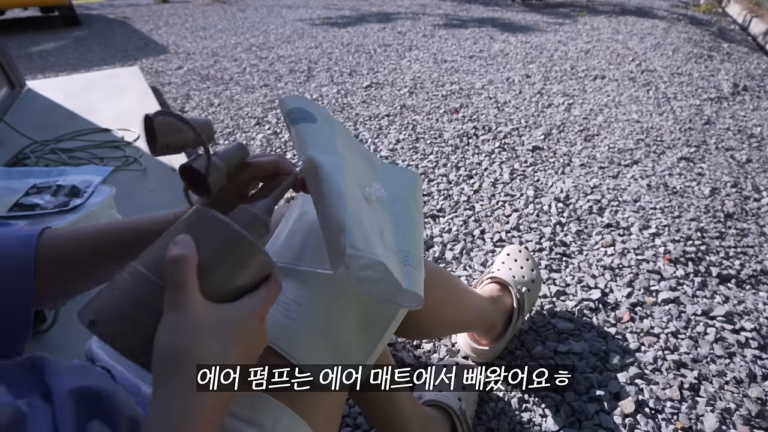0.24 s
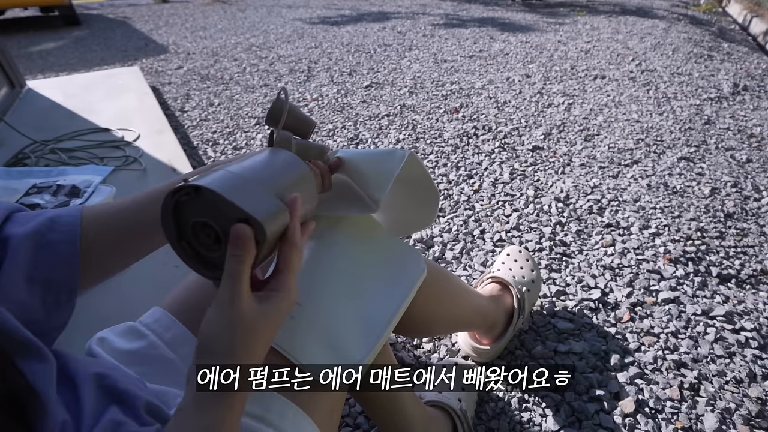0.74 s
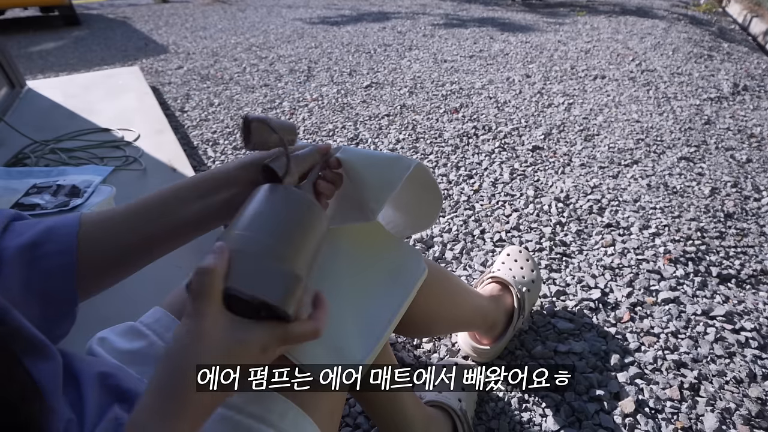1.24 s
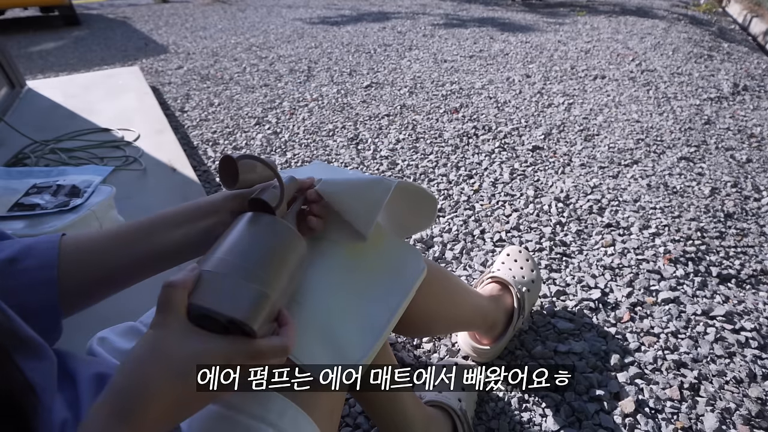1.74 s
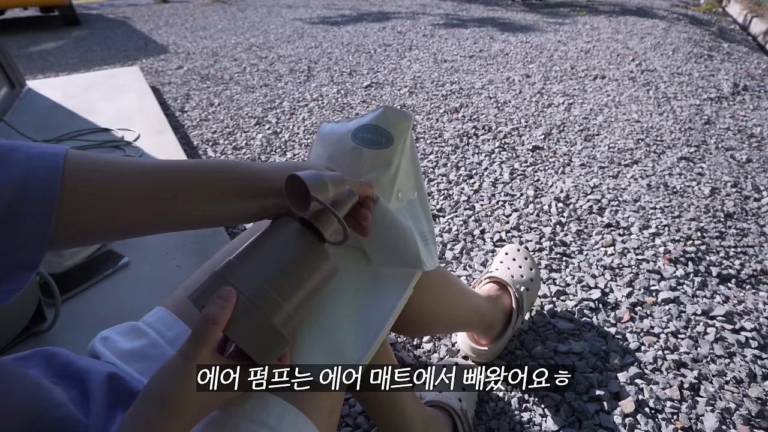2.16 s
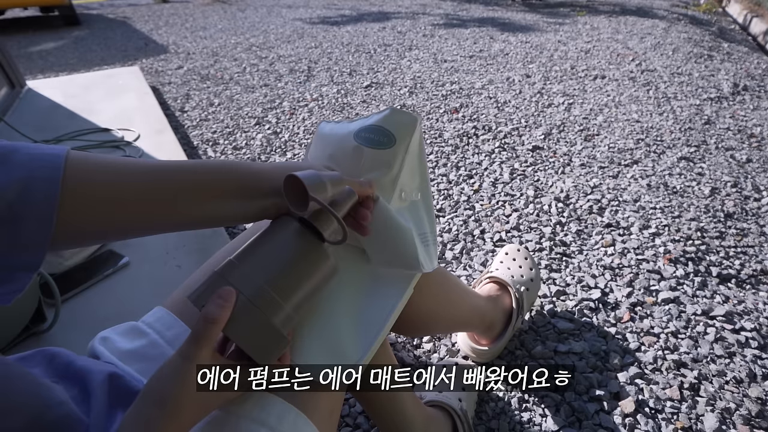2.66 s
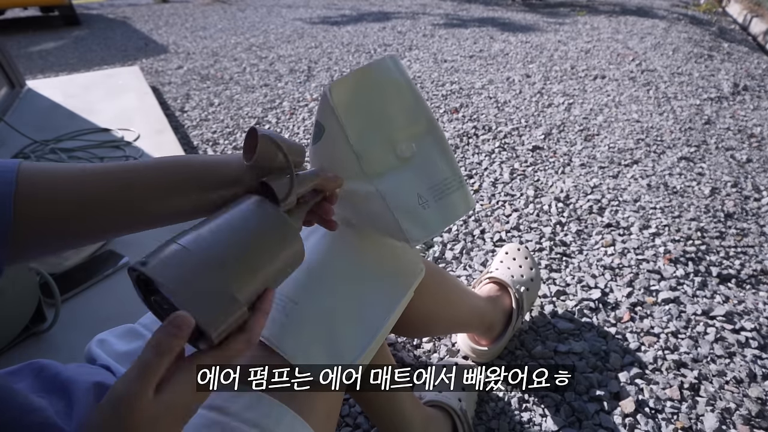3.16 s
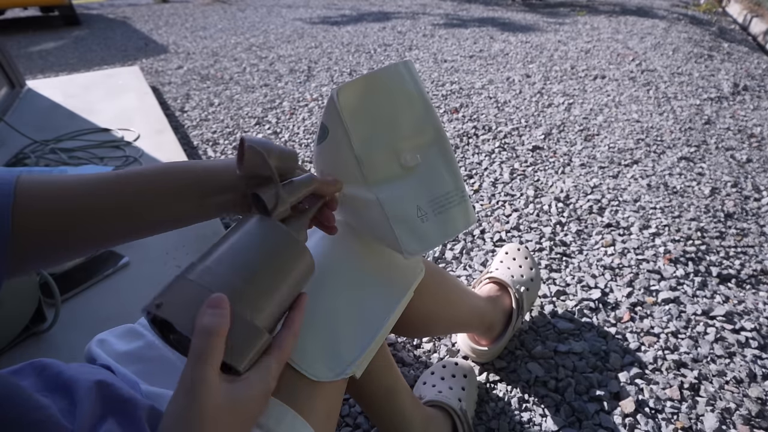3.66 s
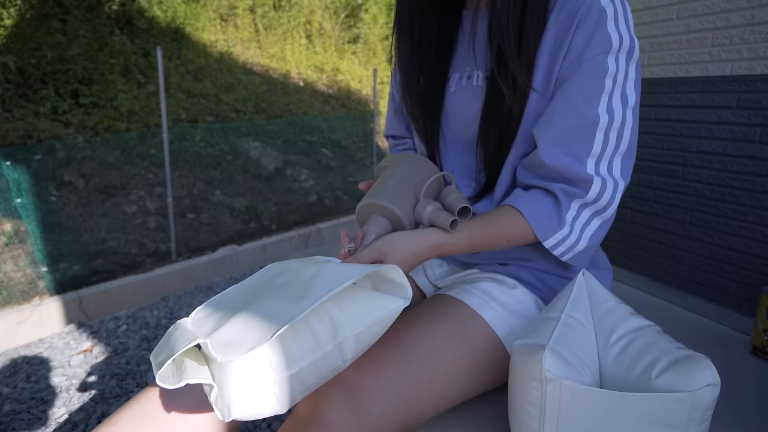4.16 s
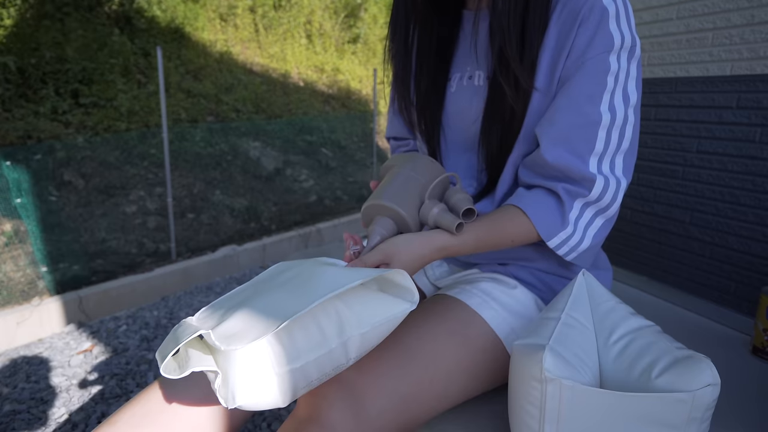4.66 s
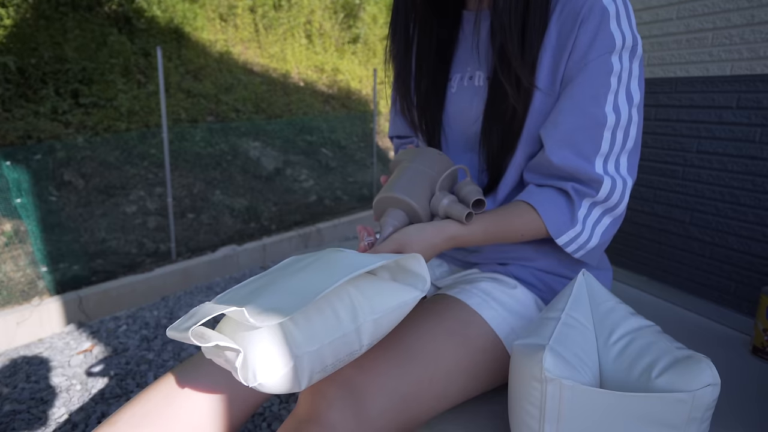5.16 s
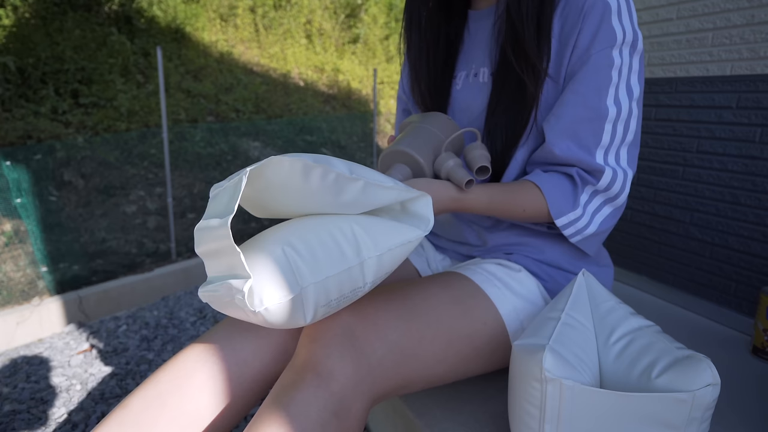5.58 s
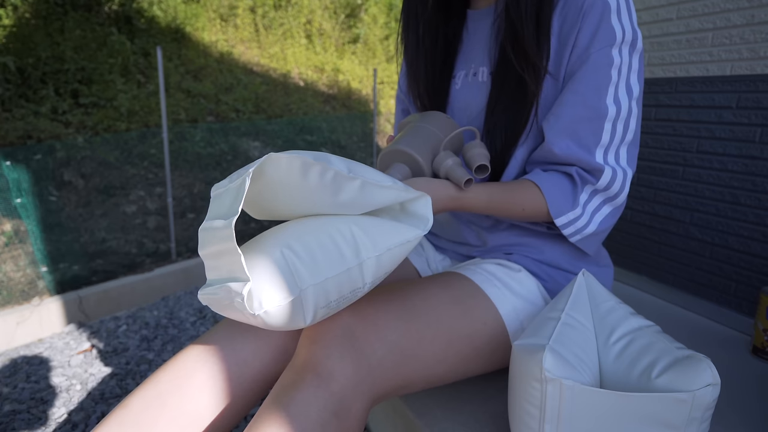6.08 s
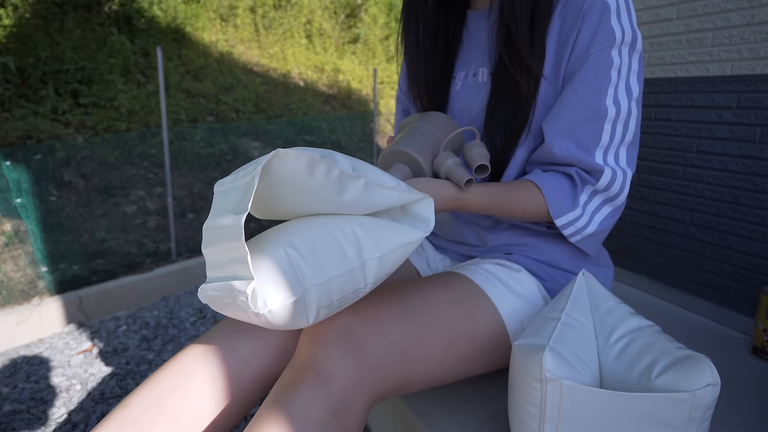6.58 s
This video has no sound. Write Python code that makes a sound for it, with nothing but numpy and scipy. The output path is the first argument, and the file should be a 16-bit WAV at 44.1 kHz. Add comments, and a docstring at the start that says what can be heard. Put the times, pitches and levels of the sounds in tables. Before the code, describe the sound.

Outdoors and close-miked, low wind rumble and insects give way to a handheld inflator: stuttering knocks, a climbing whine, then a steady hissing rush with a clear buzzing tone. Switched off, its pitch slides down; the nozzle snaps free and vinyl scuffs. A cut leads straight to a second start, less piercing and airier, holding steady at full speed until the end.

```python
"""A breeze and insects are heard first, made of coloured noise, with a soft tap and a small chirp.
The air suddenly turns much quieter, and a small battery air pump for a vinyl pillow starts: its rotor
knocks and rattles on pulsed current, whines up to speed and runs: noise rushes, sines follow the rotor.
Switched off, it coasts down while the nozzle is pulled off the valve with ticks, scuffs and a hard snap.
Abruptly, heard from the front, it starts once more and runs to the end; a quiet yard lies behind it."""
import sys
import numpy as np
from scipy import signal
from scipy.fft import rfft, irfft, next_fast_len
from scipy.io import wavfile
from scipy.ndimage import uniform_filter1d, minimum_filter1d, map_coordinates

SR = 44100
rng = np.random.default_rng(int(sys.argv[2]) if len(sys.argv) > 2 else 0)


def dump(signal):
    """Clip the signal to [-1, 1] and save it as 16-bit WAV at the path in sys.argv[1]."""
    limited = np.clip(np.atleast_2d(signal).T, -1, 1)
    pcm = np.round(limited * 32767).astype(np.int16)
    wavfile.write(sys.argv[1], SR, pcm)


N = 300266
TIME = np.arange(N) / SR  # seconds
CHOP_HZ = 97.3  # current pulses per second during a soft start

# Rotor speed, rising along an S-curve. Each row: time in seconds, turns per second.
FIRST_START_SPEED = [(0.79, 0.5), (0.92, 31.4), (1.05, 104.4), (1.18, 201.0), (1.31, 299.1), (1.44, 380.0),
                     (1.56, 435.6), (1.66, 471.0), (1.75, 488.5), (1.85, 501.1), (1.945, 507.2)]
# Full-speed settings in dB, in order: low airflow, housing rasp, jet hiss, whine.
FIRST_START_LEVELS = (-34.2, -29.6, -37, -19.6)
# How those four layers grow. Each row: dB lower at rest, turns per second by which most is gained.
FIRST_START_GROWTH = [(9, 270), (3, 250), (3, 250), (57.8, 240)]
# Peaks and dips of housing and nozzle, as the pump is held. Each row: centre in Hz, width in Hz, dB.
FIRST_START_BODY = [(298, 60, 4), (675, 130, 3), (961, 167, -3.5), (2180, 580, 10.5), (2860, 300, 7),
                    (3300, 250, -5), (3950, 450, 4), (4650, 450, -9), (5680, 578, -14.0),
                    (5700, 1800, 10.5), (7140, 3300, -6), (10100, 960, -4.4), (11988, 690, -4.9)]
# Strength of the rotor's harmonics. Each row: multiple of the speed, dB.
FIRST_START_HARMONICS = [(1, 6.6), (2, -19.7), (3, -0.4), (4, 3.8), (5, 5.1), (6, 10.9), (7, 11.9),
                         (8, 11.1), (9, 4.6), (10, 5.7), (11, 3.6), (12, 3.4), (13, -1.9), (14, -2.4),
                         (15, -1.8), (16, 3.5), (17, -2.7), (18, -0.7), (19, 1.9), (20, -3.4), (21, -7.0),
                         (22, -2.0), (23, -8.8), (24, -1.2), (25, -6.1), (26, -14.2)]
# How the plastic shell passes the sweeping harmonics. Each row: frequency in Hz, dB.
FIRST_START_SHELL = [(100, -45), (260, -36), (480, -19), (700, 0), (950, -15), (1400, -19), (1680, -19),
                     (1820, -10), (2100, -17), (2240, -19), (2380, -28), (2660, -26), (2800, -38),
                     (3000, -35), (3480, -42), (3720, -32), (3960, -31), (4440, -36), (5160, -25),
                     (5880, -35), (6600, -32), (8300, -39), (9200, -36), (11000, -43), (13500, -32)]
# Tone colour of the slow rotor's rattle. Each row: frequency in Hz, relative dB per Hz.
FIRST_RATTLE = [(650, -48), (1100, -18.5), (1750, -8), (2200, 1), (2460, -5), (2790, -24), (3010, -14),
                (3300, -26.5), (4100, -19), (4400, -24), (4900, -12.5), (5300, -14), (5700, -24),
                (6170, -17), (6680, -32), (8260, -24.5), (12400, -44), (14600, -38), (16000, -47)]


def first_start():
    """Chopped current sets the rotor turning, and its tones climb as it gains speed."""
    motion = running_up(.79, 1.945, FIRST_START_SPEED, FIRST_START_LEVELS, FIRST_START_GROWTH)
    start = dict(colour=FIRST_RATTLE, loose_s=1.026, swell_s=.006, rattle_db=-21.6, held_db=22,
                 pulse_s=1.0366, hum_db=-42)
    return pump(motion, FIRST_START_BODY, FIRST_START_HARMONICS, shimmer_db=2.8, bearing_db=-13,
                throb=.3, shell=FIRST_START_SHELL, start=start, ripple_db=-52)


# Running speed, wavering slightly with the load. Each row: time in seconds, turns per second.
FIRST_RUN_SPEED = [(1.945, 517.3), (2.05, 519.2), (2.25, 520.6), (2.45, 518.7), (2.85, 518.7),
                   (3.112, 519.8)]
# Settings in dB, in order: low airflow, housing rasp, jet hiss, whine.
FIRST_RUN_LEVELS = (-36.7, -28.7, -35.6, -31.2)
# Peaks and dips of housing and nozzle. Each row: centre in Hz, width in Hz, dB.
FIRST_RUN_BODY = [(285, 160, -3), (656, 63, 1), (964, 210, -8), (1600, 940, 8), (1930, 140, -12.1),
                  (2860, 340, 17), (3370, 160, -12), (4730, 380, -17), (4850, 130, 22), (5795, 551, -6),
                  (7349, 682, -14.0), (7530, 2146, 7.2), (14018, 824, 4.5)]
# Strength of the rotor's harmonics. Each row: multiple of the speed, dB.
FIRST_RUN_HARMONICS = [(1, -0.5), (2, -10.0), (3, -4.5), (4, -1.6), (5, -5), (6, -8), (7, -13), (8, -10),
                       (9, -13), (10, -10.5), (11, -29), (12, -24.5), (14, -32.6), (16, -17), (17, -18.5),
                       (18, -28.1), (19, -23), (20, -33), (24, -29), (25, -38.0), (26, -27.2)]


def first_run():
    """Near full speed, the load only slightly bends the steady whine."""
    motion = running(1.945, 3.112, FIRST_RUN_SPEED, FIRST_RUN_LEVELS)
    return pump(motion, FIRST_RUN_BODY, FIRST_RUN_HARMONICS, shimmer_db=1.5, bearing_db=-12, throb=.12)


# Speed after switching off, falling almost exponentially. Each row: time in seconds, turns per second.
COASTING_SPEED = [(3.112, 489.3), (3.2, 445.7), (3.3, 398.4), (3.43, 346.6), (3.56, 303.0), (3.68, 267.5),
                  (3.8, 235.9), (3.91, 211.3), (4.01, 185.6), (4.1, 165.6), (4.195, 149.1)]
# Settings in dB as the coast begins, in order: low airflow, housing rasp, jet hiss, whine.
COASTING_LEVELS = (-33.6, -27.6, -35.6, -29)
# dB lost each time the speed halves, for the same four layers in order.
LOSS_PER_HALVING = (2, 8.5, 6, 11.7)
# Further dB lost once the pump is free of the valve, for the same four layers in order.
LOSS_WHEN_FREE = (3, 5, 5, 8)
# Peaks and dips of housing and nozzle. Each row: centre in Hz, width in Hz, dB.
COASTING_BODY = [(350, 140, 4), (1057, 98, -9), (1410, 75, -9), (2250, 840, 14), (2439, 219, -8),
                 (2900, 300, 5), (3370, 120, -11), (4000, 438, 5), (4800, 1500, -6), (6022, 240, 5),
                 (7300, 560, -7)]
# Strength of the rotor's harmonics. Each row: multiple of the speed, dB.
COASTING_HARMONICS = [(1, 4.3), (2, 7.3), (3, -10.8), (4, -6.6), (5, -7.5), (6, 1.1), (7, 3.4), (8, 2.4),
                      (9, 4.0), (10, 2.2), (11, 3.1), (12, 2.1), (13, 3.0), (14, 3.7), (15, 1.2),
                      (16, -1.2), (17, 0.9), (18, 1.7), (19, -2.8), (20, -2.5), (21, -2.3), (22, -0.3),
                      (23, -1.5), (24, -0.1), (25, -3.1), (26, -1.6)]
# How the plastic shell passes the sweeping harmonics. Each row: frequency in Hz, dB.
COASTING_SHELL = [(100, -45), (170, -12), (260, -23), (350, -9), (480, -7), (700, -13), (950, -27),
                  (1200, -2), (1680, -3), (1820, 2), (1960, -1), (2100, 0), (2240, -9), (2520, -4),
                  (2800, -19), (3000, -15), (3480, -24), (3720, -13), (4440, -20), (4680, -10), (4920, -18),
                  (5160, -11), (5400, -21), (8300, -25), (9200, -19), (11000, -45)]


def coast_down(twist_s=3.64, flare_db=3.2, free_s=3.835, fade_s=.018):
    """The rotor slows and fades; the whine flares in the twist off the valve, then all layers drop."""
    t = times(3.112, 4.195)
    speed = speed_curve(COASTING_SPEED, t)
    free = step(t, free_s, fade_s)
    halvings = np.log2(speed[0] / speed)
    levels = np.array(COASTING_LEVELS)[:, None] - np.outer(LOSS_PER_HALVING, halvings)
    levels -= np.outer(LOSS_WHEN_FREE, free)
    levels[-1] += flare_db * step(t, twist_s, fade_s) * (1 - free)  # the last layer is the whine
    return pump((t, speed, levels), COASTING_BODY, COASTING_HARMONICS, shimmer_db=3.0, bearing_db=-30,
                throb=.4, shell=COASTING_SHELL)


# Rotor speed, rising along an S-curve. Each row: time in seconds, turns per second.
SECOND_START_SPEED = [(4.195, 0.0), (4.29, 35.0), (4.39, 124.4), (4.49, 223.9), (4.59, 304.6),
                      (4.69, 367.6), (4.8, 423.4), (4.92, 468.7), (5.05, 495.0), (5.2, 508.3),
                      (5.36, 514.4), (5.53, 517.0)]
# Full-speed settings in dB, in order: low airflow, housing rasp, jet hiss, whine.
SECOND_START_LEVELS = (-33.3, -28, -33.7, -43.2)
# How those four layers grow. Each row: dB lower at rest, turns per second by which most is gained.
SECOND_START_GROWTH = [(13, 220), (13, 310), (11, 280), (25, 240)]
# Peaks and dips of housing and nozzle. Each row: centre in Hz, width in Hz, dB.
SECOND_START_BODY = [(236, 87, -9), (656, 420, -0.5), (1120, 280, -17), (1700, 330, 7), (1960, 150, -4),
                     (2187, 140, 11), (2530, 430, -14.5), (2870, 690, 13.5), (4430, 250, -13),
                     (5640, 300, -11)]
# Strength of the rotor's harmonics. Each row: multiple of the speed, dB.
SECOND_START_HARMONICS = [(1, 28.2), (2, 30.8), (3, 16.3), (4, 13.9), (5, 11.6), (6, 16.9), (7, 12.8),
                          (8, 15.3), (9, 2.7), (10, -0.3), (11, 1.2), (12, 3.5), (13, -3.6), (14, -5.4),
                          (15, -7.6), (16, -0.3), (17, -8.3), (18, -8.2), (19, -10.6), (20, -13.5),
                          (21, -9.5), (22, -15.1), (23, -16.0), (24, -15.3), (25, -19.7), (26, -19.8)]
# How the plastic shell passes the sweeping harmonics. Each row: frequency in Hz, dB.
SECOND_START_SHELL = [(230, -42), (350, -28), (480, -21), (700, -31), (950, -33), (1200, -16), (1420, -6),
                      (1550, -17), (1700, -9), (2000, -7), (2200, 2), (2400, -6), (2650, -24), (3000, -16),
                      (3600, -16), (4150, -14), (4500, -1), (4850, -4), (5150, 3), (5500, -12), (6000, -16),
                      (6800, -2), (8300, 0), (11000, -9), (13500, 0)]
# Tone colour of the slow rotor's rattle. Each row: frequency in Hz, relative dB per Hz.
SECOND_RATTLE = [(650, -41), (1100, -12), (1590, -7.5), (2200, 0), (2640, -23), (3490, -16.5), (4130, -27),
                 (4610, -15.5), (5840, -28), (6980, -26), (7990, -36), (8840, -28), (10800, -36),
                 (14300, -37), (16000, -57)]


def second_start():
    """The same soft start with another tone colour, as the pump is heard from the front."""
    motion = running_up(4.195, 5.53, SECOND_START_SPEED, SECOND_START_LEVELS, SECOND_START_GROWTH)
    start = dict(colour=SECOND_RATTLE, loose_s=4.355, swell_s=.042, rattle_db=-26, held_db=19,
                 pulse_s=4.4765, hum_db=-50)
    return pump(motion, SECOND_START_BODY, SECOND_START_HARMONICS, shimmer_db=1.5, bearing_db=-15.5,
                throb=.12, shell=SECOND_START_SHELL, start=start, ripple_db=-36.5)


# Running speed, wavering slightly with the load. Each row: time in seconds, turns per second.
SECOND_RUN_SPEED = [(5.53, 525.1), (5.65, 526.2), (5.85, 526.7), (6.15, 525.3), (6.45, 526.5),
                    (6.81, 527.3)]
# Settings in dB, in order: low airflow, housing rasp, jet hiss, whine.
SECOND_RUN_LEVELS = (-34.2, -30.3, -33.8, -33.7)
# Peaks and dips of housing and nozzle. Each row: centre in Hz, width in Hz, dB.
SECOND_RUN_BODY = [(239, 220, -8), (744, 150, 0.5), (1150, 210, -15.5), (1985, 80, -8.2), (2440, 110, -17),
                   (2740, 130, -12), (3036, 240, 14.5), (4090, 350, 8.5), (4820, 190, -15),
                   (7300, 560, -6.6), (9541, 3100, 8), (9749, 920, -10.5), (14311, 569, 5.7)]
# Strength of the rotor's harmonics. Each row: multiple of the speed, dB.
SECOND_RUN_HARMONICS = [(1, -5.5), (2, -6), (3, -9), (4, 3), (5, -2.5), (6, -5), (7, -10), (8, -1),
                        (9, -12), (10, -16), (11, -17), (12, -13), (13, -20.6), (14, -34), (15, -32),
                        (16, -10.5), (18, -29.3), (20, -29.5), (21, -31.9), (22, -25), (24, -31.9),
                        (25, -19), (26, -26)]


def second_run():
    """Steady turning again, with steadier harmonics and stronger bearing tones."""
    motion = running(5.53, 6.81, SECOND_RUN_SPEED, SECOND_RUN_LEVELS)
    return pump(motion, SECOND_RUN_BODY, SECOND_RUN_HARMONICS, shimmer_db=.3, bearing_db=-6, throb=.12)


def pump(motion, body, harmonics, shimmer_db, bearing_db, throb, shell=None, start=None, ripple_db=None,
         wobble=0.00053, waver_db=.6):
    """One stretch of the pump: rushing air, rotor whine and, from rest, the soft start."""
    t, speed, (flow_db, rasp_db, hiss_db, whine_db) = motion
    turns = np.cumsum(speed * (1 + wobble * drift(35.8, t))) / SR
    air_levels = [db + waver_db * drift(9, t) for db in (flow_db, rasp_db, hiss_db)]
    flow, rush = airflow(t, speed, body, *air_levels)
    rush = rush * (1 + throb * np.cos(2 * np.pi * turns))  # the impeller rubs once a turn
    if start:
        share, rattle, hum = soft_start(t, speed, **start)
        rush = np.sqrt(1 - share) * rush + np.sqrt(share) * rattle
        rush = rush + hum + ripple(t, speed, turns, ripple_db)
    tones = from_db(whine_db) * whine(t, speed, turns, harmonics, shell, shimmer_db)
    tones = tones + from_db(rasp_db + bearing_db) * bearing(t, turns, speed)
    out = np.zeros(N)
    out[np.searchsorted(TIME, t)] = flow + rush + tones
    return out


# Broad tone colour of the rushing air. Each row: frequency in Hz, dB.
AIR_COLOUR = [(100, -31), (200, -30), (300, -9), (480, -2.5), (1100, -13.5), (2000, -4.5), (3500, -14.5),
              (5000, -15.5), (9000, -19), (12000, -26.5), (16000, -29.5)]


def airflow(t, speed, body, flow_db, rasp_db, hiss_db, flutter_db=1.32, top_power=0.83):
    """Turbulence through the housing, as (low flow, upper rush); the top opens with speed."""
    def band(low_hz, high_hz):
        def gain_at(hz):
            edges = ((1 + (low_hz / (hz + 1)) ** 16) * (1 + (hz / high_hz) ** 16)) ** -.5
            return from_db(at_hz(AIR_COLOUR, hz) + bells(body, hz)) * edges
        return noise(gain_at, len(t))
    flow = from_db(flow_db) * band(60, 1150)
    rasp = from_db(rasp_db) * band(1150, 3400)
    hiss = from_db(hiss_db) * band(3400, 18000)
    dull = signal.sosfiltfilt(signal.butter(2, 7500, fs=SR, output="sos"), hiss)
    usual_speed = np.average(speed, weights=from_db(hiss_db) ** 2)
    opening = (np.maximum(speed, 140) / usual_speed) ** top_power
    rush = rasp + dull + opening * (hiss - dull)
    return flow, rush * from_db(flutter_db * drift(44.43, t))


def whine(t, speed, turns, harmonics, shell, shimmer_db):
    """Rotor harmonics swell and fade at random, and with the shell's resonances where these are given."""
    out = 0
    for multiple, db in harmonics:
        shell_db = at_hz(shell, multiple * speed) if shell else 0
        level_db = db + shimmer_db * drift(30.58, t) + shell_db
        out = out + from_db(level_db) * np.sin(2 * np.pi * (round(multiple) * turns + rng.random()))
    return np.sqrt(2) * out


# Pitches of the bearing tones, as multiples of the rotor speed.
BEARING_PITCHES = [1.336, 9.24]
# The same tones in order. Each row: dB, phase wander in cycles.
BEARING_TONES = [(0.78, 0.13), (-0.31, 0.065)]


def bearing(t, turns, speed, onset_speed=460):
    """The ball bearings sing unsteadily between the rotor's harmonics, only near full speed."""
    singing = 1 / (1 + (onset_speed / speed) ** 12)
    out = 0
    for multiple, (db, wander) in zip(BEARING_PITCHES, BEARING_TONES):
        cycles = multiple * turns + wander * drift(40, t)
        out = out + singing * from_db(db) * np.sin(2 * np.pi * cycles)
    return out


# Hum of the windings under chopped current. Each row: multiple of the pulse rate, dB.
WINDING_HUM = [(1, -46), (3, 2), (4, -6), (5, -11.5), (6, -45.5), (7, -10.5), (8, -6.5), (9, -7)]


def soft_start(t, speed, colour, loose_s, swell_s, rattle_db, held_db, pulse_s, hum_db,
               smooth_speed=320, hum_speed=85, thump_db=-62):
    """Current pulses rattle the rotor until its inertia smooths them out: (pulsed share, rattle, hum)."""
    share = 1 / (1 + (speed / smooth_speed) ** 6)
    depth = 1 / (1 + (speed / (2.4 * smooth_speed)) ** 3)
    # The rattle is held_db weaker until the rotor breaks loose.
    strength = from_db(rattle_db - held_db * (1 - step(t, loose_s, swell_s)))
    pulses = 0.08 + 0.46 * chop(t, pulse_s, decay_s=0.0017) ** 2
    rattle = strength * coloured(colour, len(t)) * np.sqrt(1 - depth + depth * pulses)
    windings = sum(from_db(db) * np.sin(2 * np.pi * (round(k) * CHOP_HZ * t + rng.random()))
                   for k, db in WINDING_HUM)
    fade_in = np.minimum((t - t[0]) / 0.062, 1)
    hum = from_db(hum_db) * windings * fade_in / (1 + (speed / hum_speed) ** 4)
    thump = from_db(thump_db) * share * np.minimum(speed / hum_speed, 1) * np.sin(2 * np.pi * CHOP_HZ * t)
    return share, rattle, hum + thump


def chop(t, pulse_s, decay_s, uneven_db=1.0):
    """Current pulses: a quick rise and a decay in every period, each of its own strength."""
    pulse, phase = np.divmod((t - pulse_s) * CHOP_HZ, 1)
    age = phase / CHOP_HZ
    strengths = from_db(uneven_db * rng.standard_normal(512))
    return rms_one(age * np.exp(-age / decay_s) * strengths[pulse.astype(int) % len(strengths)])


def ripple(t, speed, turns, level_db, shimmer_db=3, loudest_speed=275, speed_range=105):
    """Under heavy current the three-pole armature sings at three times the speed, not near full speed."""
    strength = np.exp(-((speed - loudest_speed) / speed_range) ** 2)
    strength = strength * from_db(level_db + shimmer_db * drift(30, t))
    return np.sqrt(2) * strength * np.sin(2 * np.pi * 3 * turns)


# Short runs with gaps between them; within a run, one knock per current pulse.
# Each row: first moment in seconds, end in seconds, middle level setting in dB, ring in Hz.
KNOCK_RUNS = [(.7905, .858, -37, 3050), (.8725, .888, -28, 2050), (.894, .919, -32, 3000),
              (.9555, .971, -30, 2000), (.977, .982, -25.5, 2000), (1.009, 1.014, -28, 2200),
              (4.238, 4.243, -36, 1990), (4.282, 4.287, -41, 1870)]
# Tone colour of a knock. Each row: frequency in Hz, dB.
KNOCK_TONE = [(300, -14), (700, -19), (1200, -2), (1900, 2.5), (3000, -2.5), (4000, -5.5), (6500, -16),
              (9000, -9.5), (16000, -32)]


def rotor_knocks(spread_db=1.1):
    """The barely turning rotor knocks against its play in short runs, one knock per current pulse."""
    out = np.zeros(N)
    for first, last, db, ring_hz in KNOCK_RUNS:
        def colour_db(hz):
            return at_hz(KNOCK_TONE, hz) + bells([(ring_hz, 550, 13)], hz)
        for s in np.arange(first, last, 1 / CHOP_HZ):
            out += burst(s, db + spread_db * rng.standard_normal(), .0014, .0039, colour_db)
    return out


# A soft tap and a small chirp outdoors, then ticks, squeaks and scuffs of nozzle and vinyl.
# Each row: start in seconds, level setting in dB, rise in seconds, decay in seconds, ring in Hz, ring in dB.
SHORT_SOUNDS = [(.222, -35, .006, 0.011, 960, 20), (.362, -42.5, .014, 0.026, 5760, 40),
                (3.844, -32.5, 0.013, .008, 7600, 12), (3.9745, -18, .0004, 0.0011, 3980, 0),
                (3.980, -30, 0.00041, .002, 3600, 10), (4.049, -26, 0.002, 0.0033, 1390, 14),
                (4.057, -28.5, .002, 0.0033, 3400, 10), (4.059, -25.5, 0.0016, 0.0056, 1310, 18),
                (4.125, -43, .015, .015, 12000, -2)]
# Tone colour shared by these sounds, that of vinyl. Each row: frequency in Hz, dB.
VINYL_COLOUR = [(200, 0), (1200, 5), (4000, 3), (8000, -2.5), (12000, -6), (16000, -15)]


def taps_and_handling():
    """A soft tap and a small chirp outdoors, then nozzle and vinyl touch and rub: short ringing noises."""
    out = np.zeros(N)
    for s, db, rise_s, decay_s, ring_hz, ring_db in SHORT_SOUNDS:
        def colour_db(hz):
            return at_hz(VINYL_COLOUR, hz) + bells([(ring_hz, 0.35 * ring_hz, ring_db)], hz)
        out += burst(s, db, rise_s, decay_s, colour_db)
    return out


def snap(s=3.975, db=-13, ring_hz=7000, decay_s=0.00017):
    """The nozzle slips off the valve with one hard, very short tick."""
    age = np.maximum(TIME - s, 0)
    return from_db(db) * np.sin(2 * np.pi * ring_hz * age) * np.exp(-age / decay_s)


# Air of the breezy first moment. Each row: frequency in Hz, relative dB per Hz.
BREEZE_COLOUR = [(88, -25), (150, -7), (217, -3), (309, -13.5), (348, -5.5), (475, -6.5), (649, -12),
                 (923, -9.5), (1310, -14.5), (1500, -10), (4670, -20), (5680, -18.5), (9080, -10.5),
                 (10200, -22.5), (16000, -28)]
# Air of the quiet yard behind the pump. Each row: frequency in Hz, relative dB per Hz.
YARD_COLOUR = [(18, -40), (30, -1.5), (81, -49), (118, -7.5), (149, -18.5), (189, -4), (632, -15.5),
               (1810, -13), (4650, -18), (8300, -10), (9220, -12.5), (10500, -24), (16000, -25)]
# The insects, strongest near 9 kHz. Each row: frequency in Hz, relative dB per Hz.
INSECT_COLOUR = [(6500, -33), (8000, -20), (8800, 12), (9500, 8), (10200, -23), (12000, -45)]


def outdoors(breeze_end_s=.53, breeze_db=-39.5, yard_db=-54.5, near_insects_db=-48, far_insects_db=-58):
    """Breeze and a steady insect chorus, both coloured noise, suddenly much quieter."""
    early = TIME < breeze_end_s
    breeze = from_db(breeze_db) * coloured(BREEZE_COLOUR)
    yard = from_db(yard_db) * coloured(YARD_COLOUR)
    insects_db = np.where(early, near_insects_db, far_insects_db) + 1.0 * drift(26.1, TIME)
    return np.where(early, breeze, yard) + from_db(insects_db) * coloured(INSECT_COLOUR)


# Rumble of wind on the microphone. Each row: frequency in Hz, relative dB per Hz.
WIND_COLOUR = [(8, 1), (20, 1.5), (55, 2), (110, -7.5), (200, -13), (400, -46.5)]
# Gusts. Each row: start in seconds, end in seconds, dB, fade in seconds.
WIND_GUSTS = [(-.1, .53, -38.5, .002), (3.17, 4.15, -61, .03)]


def wind(calm_db=-80):
    """Gusts buffet the microphone with low rumble; between them the air is nearly calm."""
    strength = from_db(calm_db)
    for first, last, db, fade_s in WIND_GUSTS:
        strength = strength + from_db(db) * step(TIME, first, fade_s) * (1 - step(TIME, last, fade_s))
    return strength * from_db(1.9 * drift(15, TIME)) * coloured(WIND_COLOUR)


def running_up(first_s, last_s, speeds, full_db, growth):
    """From rest to full speed, every layer growing with it: (times, speed, levels)."""
    t = times(first_s, last_s)
    speed = speed_curve(speeds, t)
    levels = [full - lack * np.exp(-(speed / knee) ** 2) for full, (lack, knee) in zip(full_db, growth)]
    return t, speed, np.array(levels)


def running(first_s, last_s, speeds, full_db):
    """Steady work at full speed: (times, speed, levels)."""
    t = times(first_s, last_s)
    return t, np.interp(t, *np.transpose(speeds)), np.outer(full_db, np.ones(len(t)))


def speed_curve(points, t):
    """A smooth curve through points of seconds and turns per second, never below 1 turn per second."""
    along = np.linspace(0, len(points) - 1, 400)
    s, speed = (map_coordinates(column, [along], mode="nearest") for column in np.transpose(points))
    return np.maximum(np.interp(t, s, speed), 1)


def times(first_s, last_s):
    """The sample times of a stretch."""
    return TIME[(TIME >= first_s) & (TIME < last_s)]


def burst(s, db, rise_s, decay_s, colour_db, size=8192):
    """A short sound: coloured noise that swells and dies."""
    age, out, start = TIME[:size], np.zeros(N), round(s * SR)
    envelope = np.minimum(age / rise_s, 1) * np.exp(-np.maximum(age - rise_s, 0) / decay_s)
    out[start:start + size] = from_db(db) * envelope * noise(lambda hz: from_db(colour_db(hz)), size)
    return out


def from_db(db):
    """Decibels to gain."""
    return 10 ** (np.asarray(db) / 20)


def rms_one(x):
    """Scale to an rms (average strength) of 1."""
    return x / np.sqrt(np.mean(x ** 2) + 1e-20)


def at_hz(points, hz):
    """Read a spectrum on a log-frequency axis."""
    f, db = np.transpose(points)
    return np.interp(np.log(hz + 1), np.log(f), db)


def bells(resonances, hz):
    """Summed dB of bell-shaped peaks and notches."""
    return sum(db / (1 + (2 * (hz - centre) / width) ** 2) for centre, width, db in resonances)


def noise(gain_at, size):
    """Noise of rms 1 whose spectrum follows a function of frequency."""
    padded = next_fast_len(size, True)
    hz = np.arange(padded // 2 + 1) * SR / padded
    spectrum = rfft(rng.standard_normal(padded)) * gain_at(hz)
    return rms_one(irfft(spectrum, padded)[:size])


def coloured(points, size=N):
    """Noise of rms 1 with a tabled spectrum."""
    return noise(lambda hz: from_db(at_hz(points, hz)), size)


def drift(rate, t):
    """Random wavering of rms 1, heading for a new value `rate` times a second."""
    steps = rng.standard_normal(4096)
    return rms_one(np.interp((t - t[0]) * rate, np.arange(len(steps)), steps))


def step(t, at_s, fade_s):
    """A smooth change from 0 to 1 around a moment."""
    return .5 + .5 * np.tanh((t - at_s) / (2 * fade_s))


def scene():
    """Five stretches of the pump, the short sounds and the yard, the same in both channels."""
    motor = first_start() + first_run() + coast_down() + second_start() + second_run()
    short_sounds = rotor_knocks() + taps_and_handling() + snap()
    return np.tile(motor + short_sounds + outdoors() + wind(), (2, 1))


def record(dry, ceiling=0.17, cutoff_hz=15900):
    """A fast limiter holds the peaks down; the top is cut."""
    gain = np.minimum(1, ceiling / (np.abs(dry[0]) + 1e-9))
    gain = uniform_filter1d(minimum_filter1d(gain, size=65), size=65)
    top_cut = signal.ellip(12, .1, 80, cutoff_hz, fs=SR, output="sos")
    return signal.sosfilt(top_cut, dry * gain)


dry = scene()
out = record(dry)
dump(out)
```